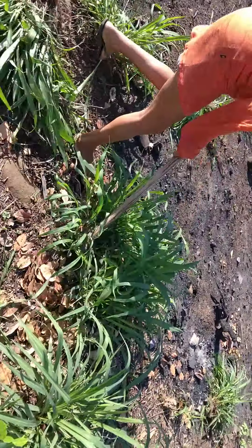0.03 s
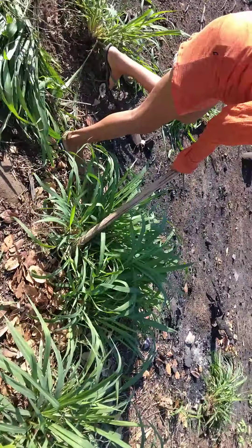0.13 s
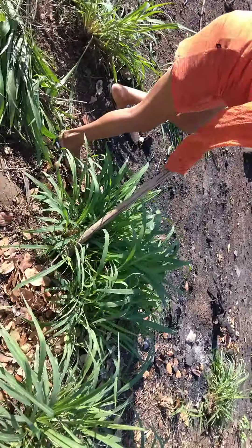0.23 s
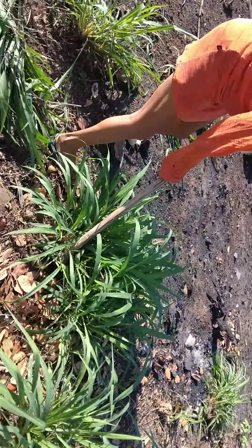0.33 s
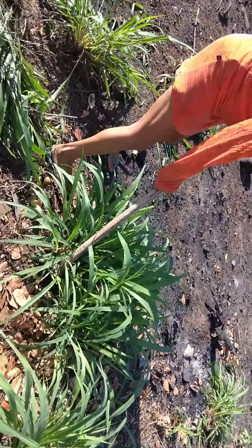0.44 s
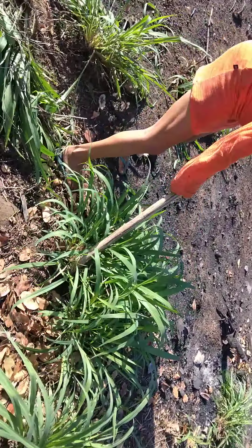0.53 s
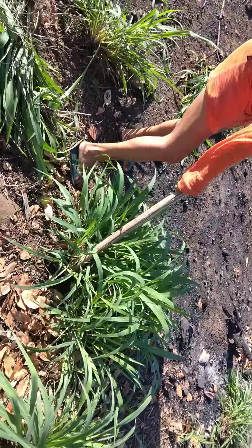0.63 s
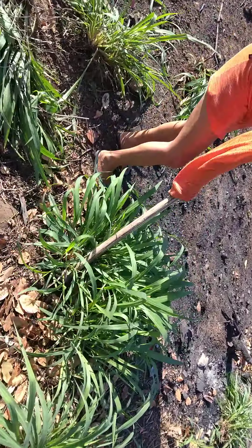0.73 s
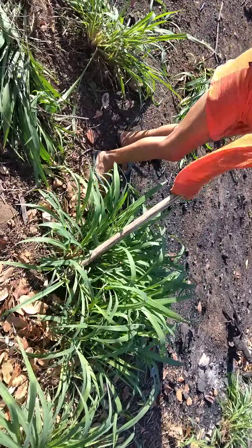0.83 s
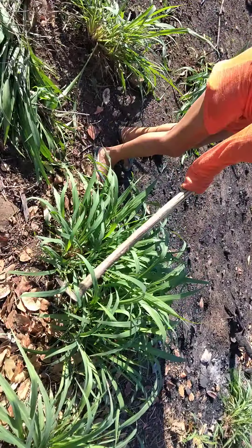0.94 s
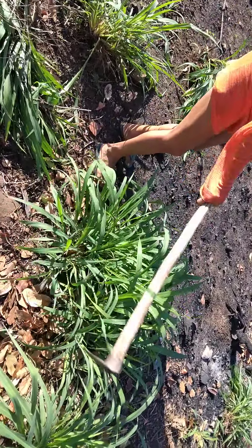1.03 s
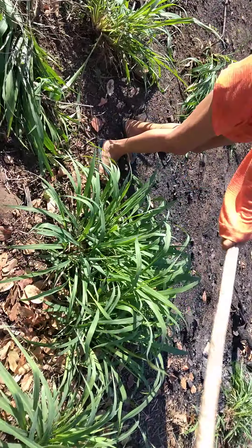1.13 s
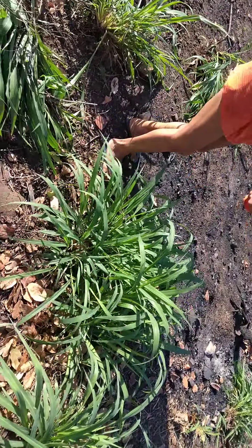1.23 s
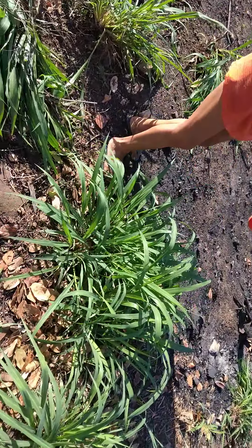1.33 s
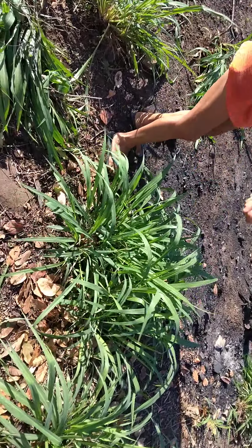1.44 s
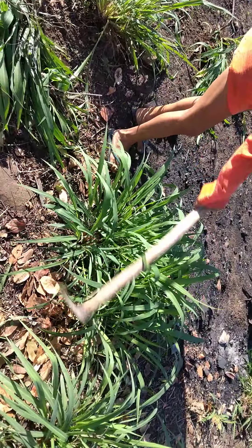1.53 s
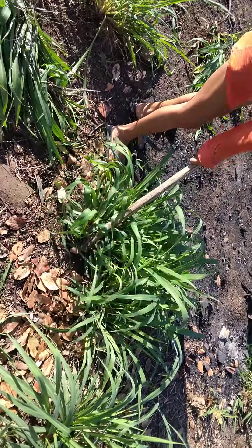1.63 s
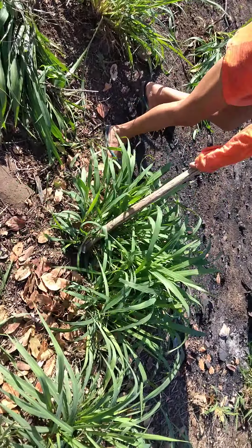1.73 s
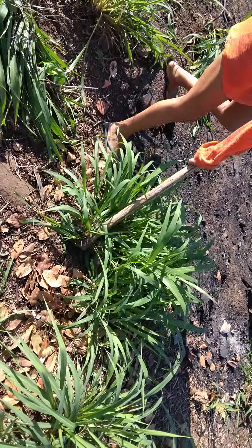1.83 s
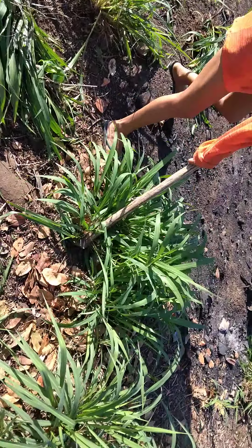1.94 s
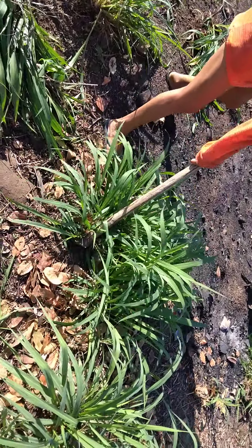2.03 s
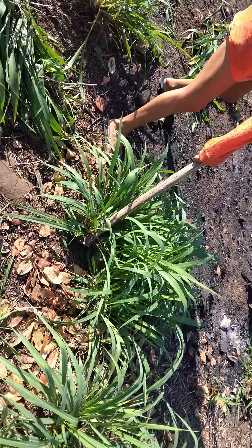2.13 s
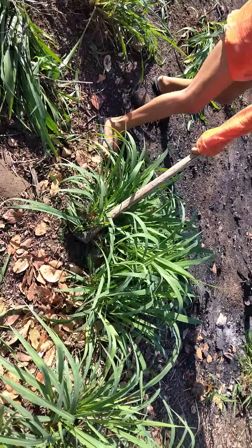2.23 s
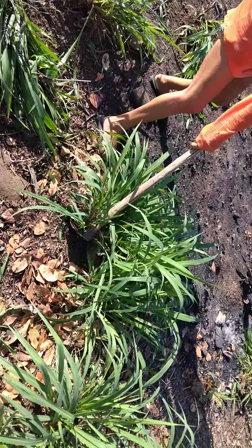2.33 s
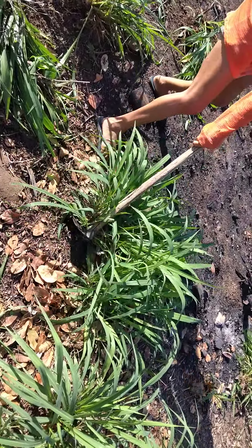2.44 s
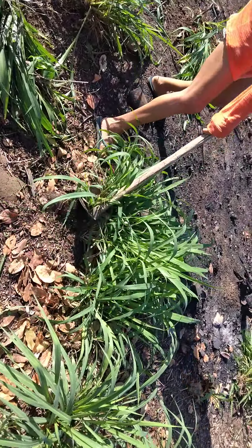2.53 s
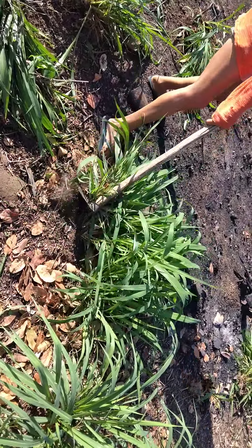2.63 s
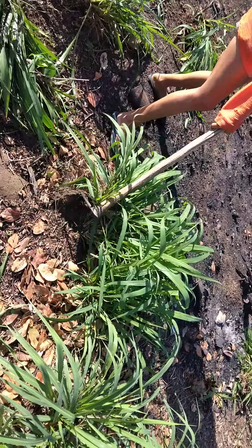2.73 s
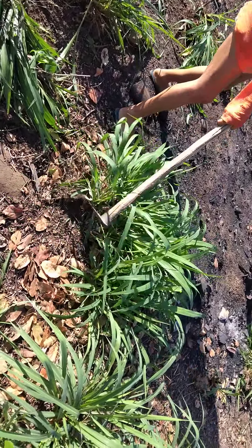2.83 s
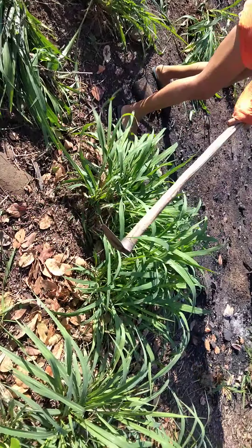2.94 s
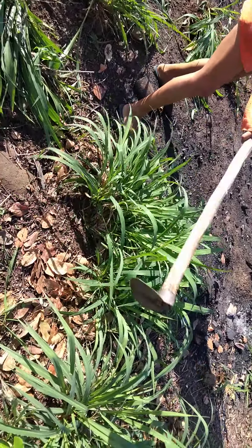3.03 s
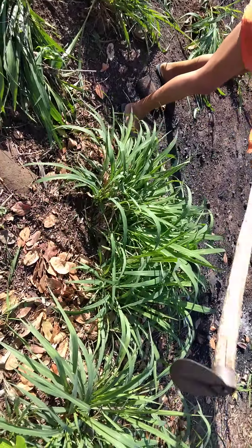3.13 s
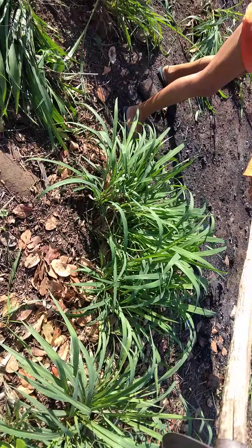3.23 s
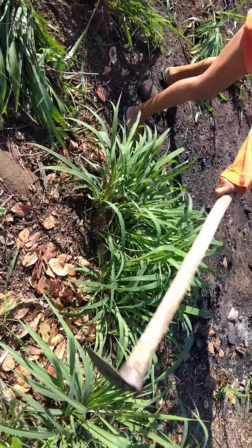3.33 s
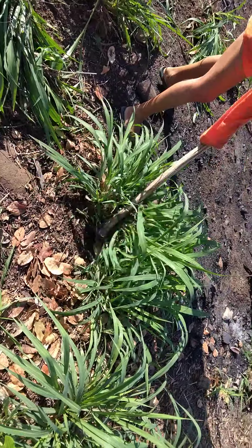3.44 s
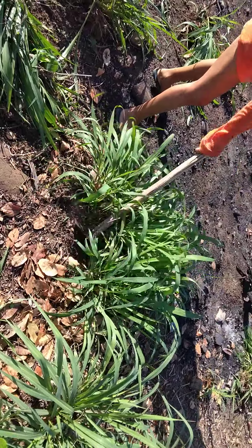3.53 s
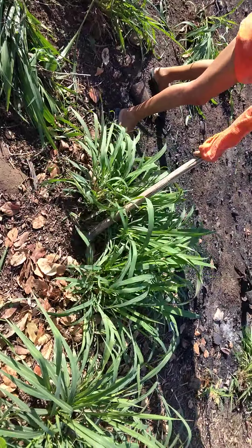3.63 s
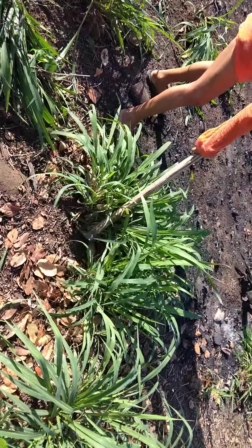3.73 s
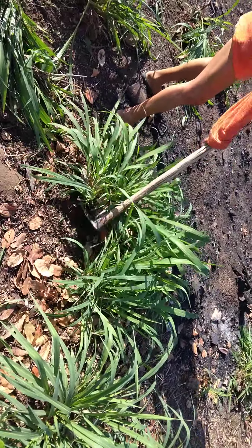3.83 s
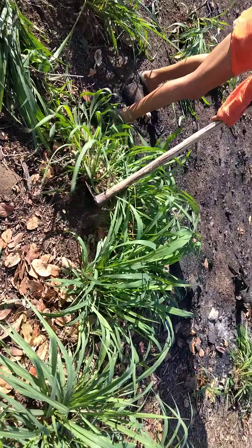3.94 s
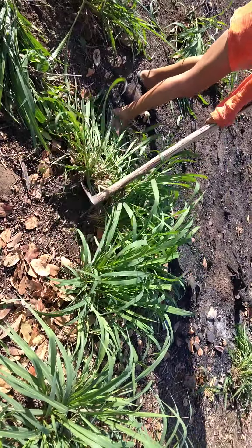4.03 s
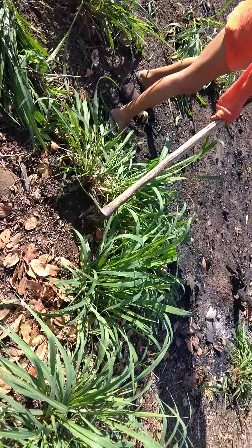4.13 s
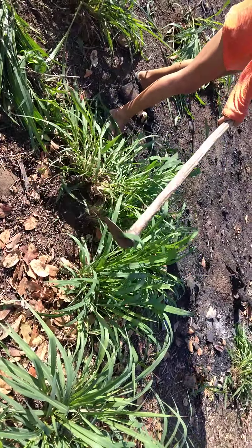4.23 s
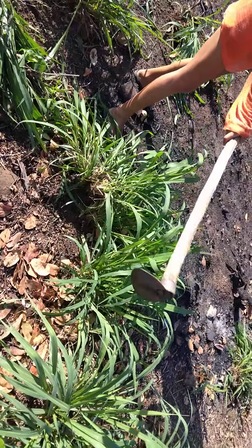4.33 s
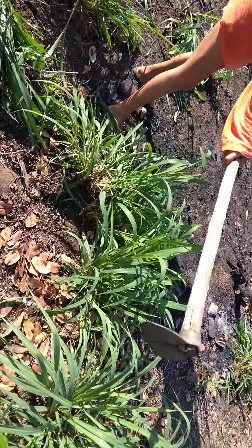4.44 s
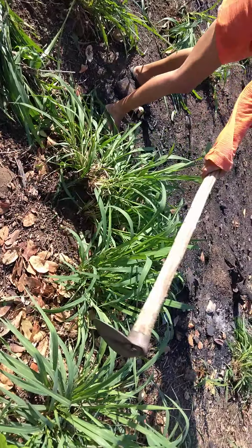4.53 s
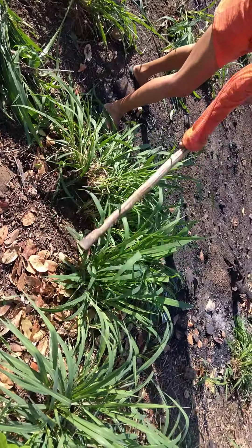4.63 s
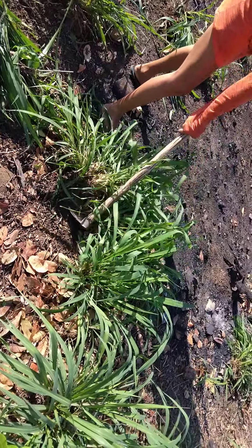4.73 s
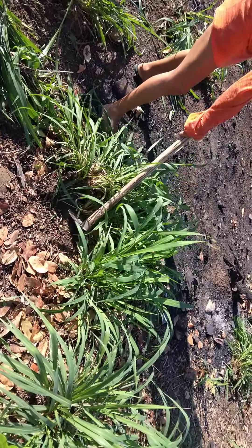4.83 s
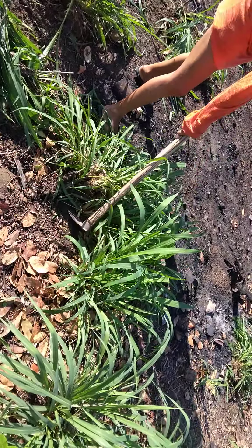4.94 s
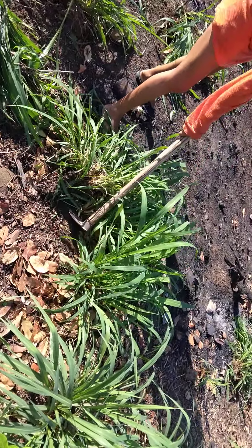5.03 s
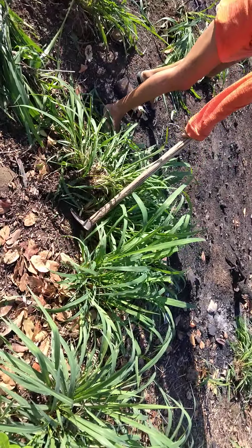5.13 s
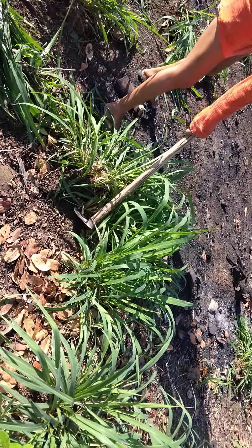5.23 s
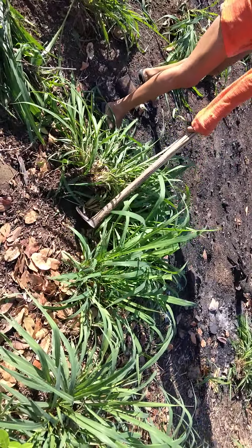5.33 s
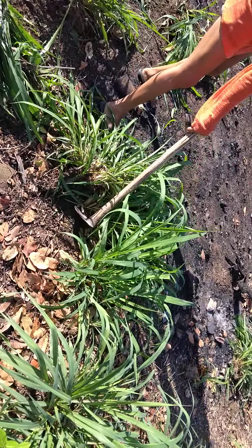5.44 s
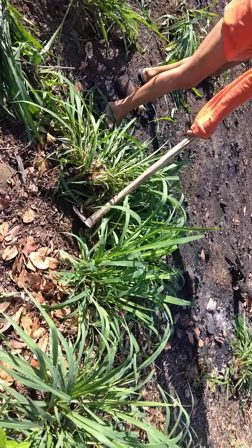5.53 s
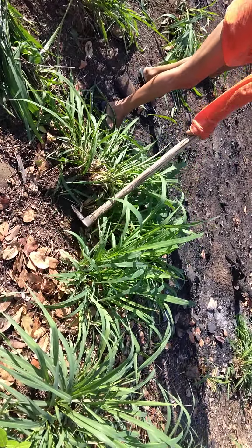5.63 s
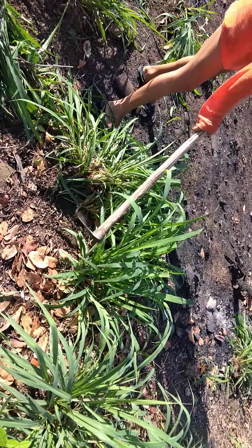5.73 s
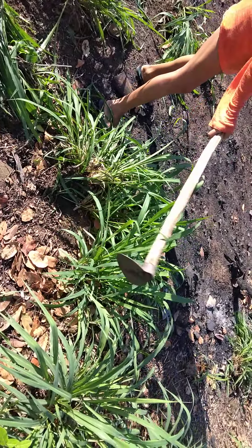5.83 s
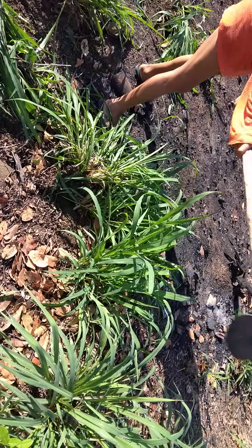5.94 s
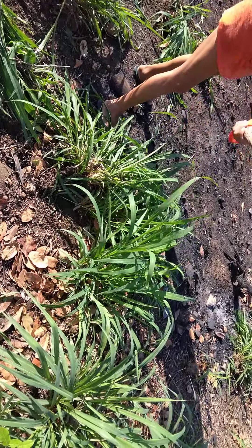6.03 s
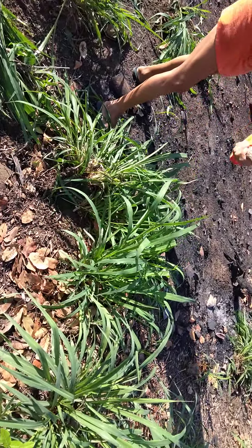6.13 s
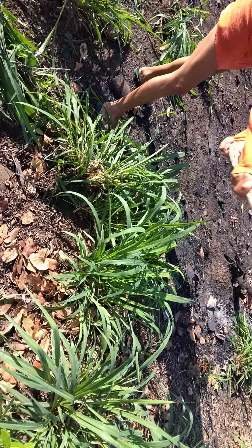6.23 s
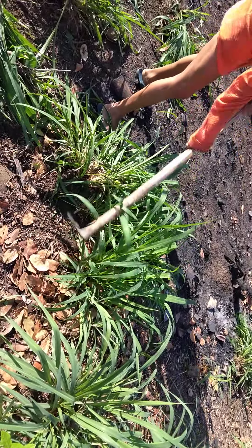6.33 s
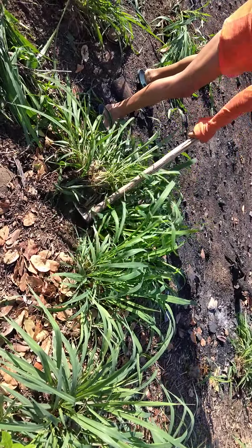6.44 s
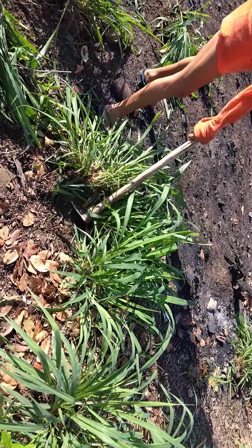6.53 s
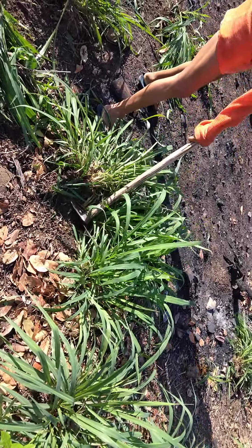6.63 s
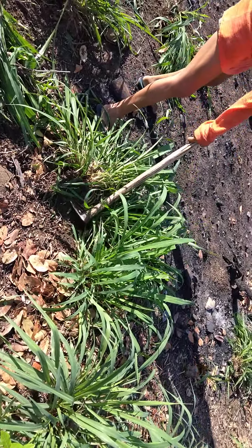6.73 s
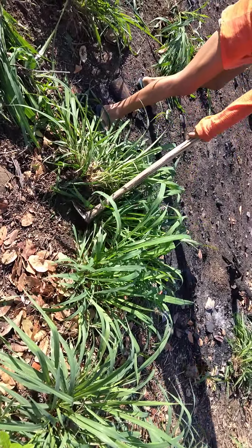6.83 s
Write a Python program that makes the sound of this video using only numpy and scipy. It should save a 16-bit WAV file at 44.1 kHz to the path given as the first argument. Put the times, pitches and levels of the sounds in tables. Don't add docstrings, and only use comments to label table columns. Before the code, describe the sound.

A hand hoe chops five times into dry soil under a grass clump, with leaves rustling and roots snapping between blows, light wind outdoors.

```python
import sys
import numpy as np
from scipy import signal
from scipy.fft import rfft, irfft, next_fast_len
from scipy.io import wavfile
from scipy.ndimage import uniform_filter1d

SR = 44100
rng = np.random.default_rng(int(sys.argv[2]) if len(sys.argv) > 2 else 0)


def put_to_file(sound):
    columns = np.atleast_2d(sound).T
    safe = np.clip(columns, -1, 1)
    whole_steps = np.round(safe * 32767)
    wavfile.write(sys.argv[1], SR, whole_steps.astype(np.int16))


def volts_from_decibels(level):
    exponent = np.asarray(level, float) / 20
    return 10 ** exponent


N = 304290
HZ = np.fft.rfftfreq(next_fast_len(N + 4096), 1 / SR)
T = np.arange(N) / SR
STEPS = T[::32]

# freq_hz, gain_db
LEFT_PORT = [(300, -2.5), (1000, -6.5), (2000, -4.5), (3500, -1.5), (4500, -1.5), (6200, -9), (7700, -2.5),
             (8300, -9), (9200, -21), (12000, -25), (15500, -30), (16300, -47.5)]
# freq_hz, gain_db
RIGHT_PORT = [(300, -3.5), (1000, -5), (2000, -10.5), (3800, -12.5), (5500, -10.5), (8000, -21),
              (9500, -14), (10700, -9.5), (11500, -14.5), (12500, -24), (15500, -28.5), (16300, -41.5)]
# freq_hz, correlation_0_1
PORT_LIKENESS = [(500, 0.96), (1500, 0.56), (2700, 0.17), (4000, 0.6), (5500, 0.52), (9000, 0.067)]


def evened(x):
    return x / np.sqrt(np.mean(x ** 2, -1, keepdims=True) + 1e-20)


def read(points, hz=HZ):
    point_hz, value = np.transpose(points)
    return np.interp(np.log(hz + 1), np.log(point_hz + 1), value)


def add(mix, start_s, sound):
    part = mix[..., round(start_s * SR):][..., :sound.shape[-1]]
    part += sound[..., :part.shape[-1]]


def shaped(x, gain):
    return irfft(rfft(x, 2 * len(HZ) - 2) * gain)[..., :N]


def delay(lag_s):
    return np.exp(-2j * np.pi * np.multiply.outer(lag_s, HZ))


def causal(db):
    cepstrum = irfft(np.log(volts_from_decibels(np.maximum(db, -100))))
    cepstrum[..., 1:len(HZ) - 1] *= 2
    cepstrum[..., len(HZ):] = 0
    return np.exp(rfft(cepstrum))


def wander(rate_hz):
    return evened(shaped(rng.standard_normal(N), 1 / (1 + (HZ / rate_hz) ** 2)))


def break_sizes(count, per_s, spread_db):
    size = volts_from_decibels(spread_db * np.minimum(rng.exponential(1, count), 4))
    return size * (rng.random(count) < per_s / SR)


def grit(count, per_s, spread_db, bed):
    size = signal.lfilter([1], [1, -.9], break_sizes(count, per_s, spread_db))
    return evened((evened(size) + bed) * rng.standard_normal((2, count)))


def pop(hz, cycles, t):
    return np.sin(2 * np.pi * hz * t) * (hz * t / cycles) * np.exp(1 - hz * t / cycles)


def strike(shape, db, soil_db, hiss_db):
    return volts_from_decibels(db + np.array([soil_db - 4, -6, hiss_db - 9]))[:, None, None] * shape


def to_ports(pair, hz):
    same = np.clip(read(PORT_LIKENESS, hz), 0, 1)
    lean_db = read(LEFT_PORT, hz) - read(RIGHT_PORT, hz)
    right = same * pair[0] + np.sqrt(1 - same ** 2) * pair[1]
    return volts_from_decibels(lean_db * np.array([[.5], [-.5]])) * [pair[0], right]


def chops():
    # start_s, crack_peak_db, soil_rel_db, hiss_rel_db, grind_s
    blade_cuts = [
        (0.0265, -7.5, -22, -12.5, 0.0046),
        (1.5825, -16, -7.5, -0.5, 0.0099),
        (3.447, -13, -11, -4.5, 0.0055),
        (4.6772, -22, -13, -1.5, 0.0085),
        (6.3722, -16, -3.5, -4.5, 0.0057),
    ]
    # start_s, peak_db, soil_rel_db, hiss_rel_db, grind_s
    root_rips = [
        (.757, -38, -14, 2, .004),
        (2.446, -31, -6, -8, .006),
        (2.461, -32, -4, -10, .004),
        (2.488, -32, -8, -6, .004),
        (3.8215, -31, -8, 10, .001),
        (3.85, -32, -8, -10, .011),
        (5.729, -56, -30, -2, .022),
        (5.837, -46, -10, 4, .004),
        (6.887, -37, -12, 0, .003),
    ]
    out, t = np.zeros((3, 2, N)), np.arange(2000) / SR
    for start_s, db, soil_db, hiss_db, grind_s in blade_cuts + root_rips:
        shape = np.minimum(t / .0015, 1) * np.exp(-np.maximum(t - grind_s, 0) / .0035)
        grains = grit(count=2000, per_s=5000, spread_db=5.5, bed=2.9)
        add(out, start_s, strike(shape * grains, db, soil_db, hiss_db))
    return out


def rings():
    # start_s, freq_hz, peak_db, rise_s
    tones = [(.0278, 4010, -11, .003), (.027, 3690, -17, .004), (.0265, 1290, -18, .0035),
             (.027, 870, -22, .0035), (.027, 1060, -24, .004), (.027, 2100, -20, .003),
             (.03, 5790, -21, .003), (1.585, 1340, -22, .004), (1.584, 4220, -24, .004),
             (1.586, 2360, -26, .004), (1.586, 7700, -27, .002), (3.447, 1790, -19, .003),
             (3.447, 3150, -24, .002), (3.446, 430, -27, .003), (3.447, 640, -28, .003),
             (3.452, 2200, -24, .002), (3.4875, 2500, -33, .0006), (3.4875, 600, -36, .001),
             (4.682, 724, -25, .004), (4.679, 1400, -29, .003), (4.679, 1800, -29, .003),
             (4.681, 1050, -24, .003), (4.681, 2580, -28, .003), (4.68, 2250, -28, .003),
             (4.4775, 4100, -52, .0006), (4.549, 3000, -49, .0007), (4.602, 3600, -53, .0006),
             (4.658, 600, -38, .001), (4.6575, 1400, -42, .0006), (6.3757, 694, -22, .003),
             (6.372, 2750, -16, .002), (6.3757, 380, -22, .002), (6.3755, 3150, -18, .0025),
             (6.375, 2150, -22, .002), (2.4905, 4100, -26, .0008), (2.5125, 1500, -27, .0008),
             (2.5675, 1400, -32, .001), (2.2262, 1800, -24, .0005), (3.8135, 7700, -31, .0008),
             (3.8135, 10800, -35, .0005), (3.822, 7460, -29, .0007), (3.822, 10000, -30, .0005),
             (3.822, 13500, -36, .0005), (3.822, 1600, -36, .001), (3.83, 1600, -30, .0012),
             (3.837, 2000, -31, .001), (3.8812, 1500, -26, .0008), (.758, 11200, -40, .0008),
             (1.0106, 7430, -37, .0015), (1.0106, 10500, -42, .001), (5.839, 8000, -45, .0008)]
    out, t = np.zeros((2, N)), np.arange(1000) / SR
    for start_s, hz, db, rise_s in tones:
        turn, u = 2 * np.pi * hz * t, t / max(rise_s, 1e-4)
        swell = u * np.exp(.5 - .5 * u ** 2)
        add(out, start_s, volts_from_decibels(db) * swell * to_ports([np.sin(turn), np.cos(turn)], hz))
    return out


def thuds():
    # start_s, knock_db, knock_hz, shake_db, shake_lead_s
    blows = [
        (0.0286, -25, 134, -20, 0.00049),
        (1.5893, -27, 168, -19.5, 0.0017),
        (2.51, -43.5, 190, -40, .002),
        (2.797, -45, 240, -50, 0.0028),
        (3.449, -27, 149, -23, 0.00035),
        (3.851, -44, 180, -46, 0.0022),
        (4.683, -20, 160, -19, 0.0017),
        (6.3758, -13, 178, -19, 0.0008),
    ]
    shake_hz, left_lag_s = 62, .00018
    out, t = np.zeros(N), np.arange(6000) / SR
    for start_s, knock_db, knock_hz, shake_db, lead_s in blows:
        dip = -.9 * np.exp(-((t - .0014) / 0.00036) ** 2)
        knock = np.sin(2 * np.pi * knock_hz * t) * np.exp(-t / 0.0074)
        shake = np.sin(2 * np.pi * shake_hz * t) * np.exp(-t / 0.013)
        add(out, start_s - .002, volts_from_decibels(knock_db) * dip)
        add(out, start_s, volts_from_decibels(knock_db) * knock)
        add(out, start_s - lead_s, volts_from_decibels(shake_db) * shake)
    return shaped(out, delay([left_lag_s, 0]))


def snaps():
    # start_s, peak_db, pitch_hz, soil_rel_db
    roots = [(.7575, -30, 3100, -35), (0.7897, -19, 5600, -21), (1.0124, -23, 5000, -24),
             (1.563, -29, 2580, -13), (2.2262, -12.5, 2840, -10.5), (2.3065, -25.5, 2770, -11),
             (2.3929, -18, 3200, -9.5), (2.4352, -18, 2960, -18), (2.4596, -21, 2200, -11.5),
             (2.49, -18, 2200, -6), (2.5062, -16, 4500, -16), (2.513, -14, 2200, -5),
             (2.5232, -17, 2400, -12), (2.5674, -21, 3070, -10), (2.7066, -30, 4100, -24.5),
             (3.4286, -27, 3210, -6), (3.57, -29.5, 2500, -5), (3.8142, -27, 4660, -10),
             (3.821, -23, 3310, -26), (3.8307, -22, 3000, -12), (3.8364, -23, 3430, -12),
             (3.8554, -22, 3700, -12), (3.8812, -11.5, 3320, -9.5), (4.6437, -24, 2510, -15),
             (5.8384, -28, 3980, -23.5), (6.3326, -21, 2000, -15), (6.351, -24, 4530, -14),
             (6.3605, -23, 3300, -14), (4.6805, -16, 2300, -12), (3.8497, -20, 2800, -8),
             (3.9215, -18, 2800, -12), (5.1586, -45, 2600, -3)]
    # start_s, peak_db, dryness_db (hiss)
    twigs = [(0.2086, -34, -7), (.2674, -44, 20), (.3275, -33, -5), (.355, -41, -14), (1.062, -37, 19),
             (1.152, -45, 14.5), (1.544, -35.5, 1.5), (2.0662, -42, -14), (2.2656, -37, -12),
             (2.3805, -42, -13.5), (2.4, -30, -13), (2.8017, -36, 3.5), (2.9885, -40.5, 8),
             (3.391, -38, -4), (3.488, -29, -17), (3.7253, -39, -14), (3.911, -32, -16.5),
             (4.057, -32, -17), (4.2452, -34, -8.5), (4.6583, -38, 6), (5.03, -46, 15), (5.385, -46, 12),
             (5.3247, -45.5, -25), (5.6038, -36, -8), (5.708, -42, -10), (5.7289, -38, -14),
             (5.8125, -41, 5), (6.4794, -38, 12), (6.581, -46, 12), (6.4969, -41, -1), (6.8248, -43, 10)]
    root_hiss_db, twig_hz, twig_soil_db = -8, 3700, -16.5
    rows = [(*root, root_hiss_db) for root in roots]
    rows += [(start_s, db, twig_hz, twig_soil_db, dry_db) for start_s, db, dry_db in twigs]
    out, t = np.zeros((3, 2, N)), np.arange(1000) / SR
    click = np.arange(1000) == 4
    for start_s, db, hz, soil_db, hiss_db in rows:
        splinters = .5 * rng.standard_normal((2, 1000)) * np.exp(-t / .003)
        push = splinters - 5 * click
        ring = splinters - 1.2 * pop(hz, .45, t)
        tick = splinters - 2 * click
        hiss_db = min(hiss_db, -26 - db)
        add(out, start_s + .0008, strike(np.array([push, ring, tick]), db - 5.0, soil_db, hiss_db))
    return out


def bump(start_s, stop_s, rise_s, fall_s):
    return -20 * np.maximum(np.maximum((start_s - STEPS) / rise_s, (STEPS - stop_s) / fall_s), 0)


def stirred(db, soil_db, fade_db):
    soil_fade, hiss_fade, hiss_db = .5, -0.042, -3.5
    over_db = np.array([min(soil_db, -3) + soil_fade * fade_db, 0 * fade_db, hiss_db + hiss_fade * fade_db])
    return volts_from_decibels(db + fade_db + over_db) ** 2


def effort():
    # start_s, swish_db, spill_20db_s, settle_db, soil_rel_db
    swings = [
        (0.021, -25.5, 0.055, -46, -7),
        (1.578, -29, 0.085, -44.5, -5.5),
        (3.441, -34, 0.0556, -41.5, -6),
        (4.679, -37.5, 0.0452, -46.5, -5),
        (6.366, -34.5, 0.075, -47, -1),
    ]
    # start_s, stop_s, leaves_db, fade_20db_s, soil_rel_db
    drags = [(0.302, .44, -64.5, 0.4, -14), (0.459, 0.507, -54.5, .33, -11.5), (.66, 0.76, -45.5, .05, -8),
             (0.856, 0.966, -47.5, 0.15, -10.5), (1.035, 1.06, -57, .05, -3), (1.12, 1.16, -62, .3, -12),
             (1.76, 1.83, -54, .15, -14), (2.12, 2.17, -62, .2, -9), (2.19, 2.42, -55.5, .1, -10),
             (2.44, 2.55, -41.5, .16, -6), (2.652, 2.7, -46, .27, -12.5), (2.79, 2.83, -52, .2, -7),
             (3.76, 3.81, -51, 0.05, -15), (3.821, 3.95, -41.5, .25, -11), (4.1, 4.14, -54, .1, -18),
             (4.24, 4.265, -57, .06, -14), (4.33, 4.36, -63, .2, -14), (5.27, 5.4, -61, .3, -15),
             (5.585, 5.6, -63, .08, -17), (5.7, 5.72, -59, .1, -20), (5.73, 5.755, -60, .02, -30),
             (5.812, 5.836, -57, .06, -6), (6.6, 6.69, -64, .15, -14), (6.8, 6.88, -63, -3, -11)]
    bed_db, swell_db = -69, 4
    swish_rise_s, settle_s, grab_s = 0.019, 0.3, 0.02
    power = stirred(bed_db, -10, 0 * STEPS)
    for start_s, swish_db, spill_s, settle_db, soil_db in swings:
        power += stirred(swish_db, soil_db, bump(start_s, start_s, swish_rise_s, spill_s))
        settling = bump(start_s + 0.021, start_s + .03, swish_rise_s, settle_s)
        power += stirred(settle_db, soil_db - 5, settling)
    for start_s, stop_s, db, fall_s, soil_db in drags:
        growth_db = swell_db * np.clip((STEPS - stop_s) / (stop_s - start_s + 1e-3), -1, 0)
        power += stirred(db + growth_db, soil_db, bump(start_s, stop_s, grab_s, fall_s))
    return np.array([np.interp(T, STEPS, db) for db in 10 * np.log10(power)])


def slips():
    # start_s, level_db, fade_20db_s, thinness_0_1
    blades = [(.69, -54, .1, 0), (.79, -54, .06, .3), (.885, -53, .12, 0), (.955, -52, .15, .1),
              (.92, -52, .1, 0), (1.014, -46, .05, .05), (1.05, -54, .04, .3), (1.066, -48, .012, .3),
              (2.53, -43, .12, .05), (3.815, -42, .01, 0), (3.86, -44, .2, .05), (4.25, -58, 0.07, 0),
              (5.735, -64, .04, 0), (5.772, -64, .03, 0), (5.815, -56, .05, .04), (5.842, -51, .03, .15),
              (6.372, -35, .045, .06), (4.71, -45, .16, .04)]
    power = np.zeros((2, len(STEPS)))
    for start_s, db, fall_s, thin in blades:
        share = np.clip([1 - thin, thin], 0, 1)
        power += np.outer(share, volts_from_decibels(db + bump(start_s, start_s, 0.02, fall_s)) ** 2)
    return [np.interp(T, STEPS, np.sqrt(part)) for part in power]


def crackle(per_s, spread_db):
    size = break_sizes(N, per_s, spread_db)
    kind, t, out = rng.integers(0, 16, N), np.arange(200) / SR, np.zeros((2, N))
    for k, hz in enumerate(np.geomspace(2100, 12000, 16)):
        train = signal.oaconvolve(size * (kind == k), evened(pop(hz, 1.3, t)))[:N]
        out += [train, np.roll(train, rng.integers(-12, 12)) * rng.choice([-1, 1])]
    return evened(out)


def rustle():
    levels_db = effort() + np.array([[-5.0], [-.9], [-.9]])
    clumps_db = 1.3 * wander(40) + np.array([1.1 * wander(35) for _ in levels_db])
    grains = grit(count=N, per_s=900, spread_db=2.6, bed=2) + .4 * crackle(per_s=1200, spread_db=2.6)
    out = volts_from_decibels(levels_db + clumps_db)[:, None] * grains
    broad, thin = slips()
    blade_grains = grains[:, ::-1]
    thin_grains = evened(signal.lfilter([1, -2, 1], [1, .75, .6], blade_grains))
    out[2] += volts_from_decibels(clumps_db[2]) * (broad * blade_grains + 2.5 * thin * thin_grains)
    return out


def scrapes():
    # start_s, length_s, freq_hz, width_hz, level_db
    rubs = [(.165, .004, 5000, 4000, -48), (.44, .006, 5000, 4000, -52), (.53, .003, 11500, 7000, -54),
            (.552, .003, 12500, 6000, -57), (.62, .06, 3200, 2000, -51), (.645, .03, 7900, 1200, -52),
            (.805, .05, 3300, 3000, -53), (.5, .06, 7500, 1500, -55), (.675, .035, 7500, 1500, -46),
            (.685, .045, 3300, 1200, -45), (.725, .022, 7500, 1200, -46), (.771, .004, 3500, 2500, -44),
            (.858, .05, 7500, 1200, -47), (.94, .035, 7700, 1500, -45), (.94, .035, 10700, 1500, -50),
            (.973, .003, 9000, 7000, -43), (1.034, .003, 10500, 4000, -55), (1.048, .024, 14500, 2500, -52),
            (1.048, .024, 10700, 1800, -50), (1.563, .008, 7600, 3000, -37), (1.572, .005, 3500, 3000, -31),
            (1.708, .012, 4000, 1800, -42), (2.446, .004, 4200, 2000, -36), (2.81, .008, 1500, 2500, -50),
            (2.995, .012, 3200, 1500, -54), (3.065, .02, 4400, 5000, -58), (3.41, .005, 3400, 1500, -48),
            (3.419, .008, 2300, 1500, -44), (3.434, .004, 3000, 3000, -36), (3.444, .004, 4000, 3000, -30),
            (4.668, .005, 4000, 3000, -39), (4.735, .035, 3500, 2500, -48), (4.3446, .004, 4060, 3000, -52),
            (5.725, .034, 5000, 1600, -46), (5.725, .03, 10800, 2000, -52), (5.727, .03, 7600, 1200, -56),
            (5.805, .025, 2500, 2500, -54), (5.765, .018, 10500, 3000, -56),
            (5.778, .002, 13000, 6000, -56)]
    # start_s, length_s, freq_hz, width_hz, level_db
    more_rubs = [(5.81, .035, 10800, 2500, -55), (5.862, .022, 8000, 1200, -60),
                 (5.876, .003, 3700, 2000, -56), (1.597, .065, 7600, 1200, -40),
                 (3.46, .035, 1500, 1500, -43), (5.728, .006, 5000, 2500, -45), (5.8, .03, 7500, 2500, -56),
                 (6.35, .02, 10500, 4000, -42), (3.851, .012, 7500, 1200, -38),
                 (3.883, .005, 2000, 3500, -30), (3.91, .003, 300, 400, -36), (2.5, .07, 1400, 1000, -38),
                 (3.68, .1, 4300, 1800, -54)]
    out, t = np.zeros((2, N)), np.arange(3000) / SR
    for start_s, length_s, hz, width_hz, db in rubs + more_rubs:
        noise = grit(count=3000, per_s=900, spread_db=4.5, bed=1.2)
        body = signal.iirpeak(hz, .7 * hz / width_hz, SR)
        coloured = evened(signal.lfilter(*body, signal.lfilter(*body, noise)))
        shape = np.minimum(t / (.3 * length_s), 1) * np.exp(-(t / length_s) ** 3)
        add(out, start_s, volts_from_decibels(db - 2.5) * shape * to_ports(coloured, hz))
    return out


def band_filters():
    edges_hz = [90, 1967, 6930]
    cut, low, high = (1 / (1 + (HZ / hz) ** 5) for hz in edges_hz)
    ports_db = np.array([read(LEFT_PORT), read(RIGHT_PORT)])
    ports = causal(10 * np.log10(1 - cut + 1e-10) + ports_db)
    pairs = np.array([low, high - low, 1 - high])[:, None] * ports
    return pairs / np.sqrt((abs(pairs) ** 2).mean((1, 2), keepdims=True) / 2)


def wind():
    # peak_s, level_db, half_width_s, left_minus_right_db
    gusts = [(.1, -60, .2, -6), (.45, -56.5, .2, -10.5), (.85, -52.5, 0.17, -19.5),
             (1.46, -55.5, 0.086, -9), (1.59, -38.5, 0.047, 2), (1.75, -55, 0.22, -12), (2.3, -63, .4, -6),
             (4.2, -59.5, .06, -6), (4.54, -52, .08, -18), (5, -62, .25, -6), (6.15, -59, .1, -15),
             (6.88, -57, .05, -18), (.2, -59, .06, -15), (4.07, -59, .05, -18)]
    # peak_s, signed_height, width_s
    puffs = [
        (.615, -0.042, 0.0043),
        (.948, -0.085, 0.0026),
        (1.629, 0.091, 0.032),
        (1.69, 0.051, 0.0033),
        (1.897, .09, 0.0027),
        (2.008, 0.064, 0.0027),
        (2.06, 0.031, 0.0031),
        (4.322, 0.11, 0.0035),
        (4.435, .04, .003),
        (4.527, -0.033, 0.003),
    ]
    # freq_hz, gain_db
    colour = [(10, 4.5), (22, 0), (40, -4), (70, -12.5), (120, -17.5), (250, -59)]
    breeze_db, breeze_pan_db = -60, -4
    side = np.array([[.5], [-.5]])
    power = volts_from_decibels(breeze_db + side * breeze_pan_db + 0 * STEPS) ** 2
    for peak_s, db, width_s, pan_db in gusts:
        power += volts_from_decibels(db + side * pan_db) ** 2 * np.exp(-((STEPS - peak_s) / width_s) ** 2)
    level = np.array([np.interp(T, STEPS, port) for port in np.sqrt(power)])
    lumps_db = np.array([4.2 * wander(8), 3. * wander(20)])
    rumble = evened(shaped(rng.standard_normal((2, N)), volts_from_decibels(read(colour))))
    out = level * volts_from_decibels(7.5 + lumps_db) * rumble
    for peak_s, height, width_s in puffs:
        u = (T - peak_s) / width_s
        out[1] += height * (np.exp(-u ** 2) - 0.24 * np.exp(-((u - 2.5) / 0.85) ** 2))
    return out


def birds():
    # start_s, length_s, start_hz, end_hz, level_db
    calls = [
        (1.229, 0.11, 2710, 2620, -63.5),
        (2.973, 0.061, 704, 650, -62),
        (4.275, 0.05, 707, 686, -63),
        (4.42, .18, 2510, 2510, -66.5),
        (4.97, 0.225, 2655, 2655, -68),
        (6.101, 0.039, 3270, 2880, -63.5),
        (6.428, 0.075, 690, 690, -53),
        (6.505, 0.03, 690, 690, -60),
        (6.555, .03, 690, 690, -66),
    ]
    out, waver, flutter = np.zeros(N), wander(30), wander(25)
    for start_s, length_s, from_hz, to_hz, db in calls:
        hz = np.linspace(from_hz, to_hz, round(length_s * SR))
        first = round(start_s * SR)
        now = slice(first, first + len(hz))
        tone = np.sin(2 * np.pi * np.cumsum(hz * (1 + .003 * waver[now])) / SR)
        fade = np.minimum(np.hanning(len(hz)) * (1 + length_s / .07), 1) ** .8
        add(out, start_s, volts_from_decibels(db + 1.5 * flutter[now]) * tone * fade)
    return out * volts_from_decibels(np.array([[1.5], [-1.5]]))


def air():
    # freq_hz, gain_db
    hum = [(60, -15), (100, -15), (350, -26), (650, -30.5), (1500, -50.5), (3000, -33.5), (5000, -42),
           (7700, -48), (8700, -54.5), (10800, -44.5), (16000, -59)]
    a, b = rng.standard_normal((2, N))
    return volts_from_decibels(-60.5 + 1.2 * wander(2.5)) * evened(shaped(np.array([a, 0.16 * a + b]), volts_from_decibels(read(hum))))


def scene():
    near = rfft(rustle() + chops() + snaps(), 2 * len(HZ) - 2)
    same = np.clip(read(PORT_LIKENESS), 0, 1)
    left = near[:, 0] * delay(2.5 / SR)
    right = same * near[:, 0] + np.sqrt(1 - same ** 2) * near[:, 1]
    work = irfft((np.stack([left, right], 1) * band_filters()).sum(0))[:, :N]
    return work + thuds() + wind() + birds() + air() + rings() + scrapes()


def low_pass(x):
    return signal.sosfilt(signal.butter(12, 16520, fs=SR, output="sos"), x)


def record(dry):
    # start_s, stop_s, depth_db
    shut = [
        (1.227, 1.544, -24),
        (2.015, 2.054, -15),
        (2.072, 2.095, -14),
        (3.096, 3.378, -23.5),
        (4.416, 4.645, -23.5),
        (5.037, 5.089, -9),
        (5.091, 5.152, -27),
        (5.522, 5.555, -11.5),
        (5.633, 5.651, -8),
        (5.885, 6.334, -25),
    ]
    # centre_s, lift_db, width_s
    lifts = [(1.246, 11.5, 0.011), (1.27, 10, 0.018), (1.305, 8, 0.015), (1.332, 11, 0.019),
             (1.434, 4, .008), (4.48, 11, .008), (4.55, 4.5, 0.009), (4.579, 15, 0.01), (4.62, 14, 0.012),
             (4.603, 10, .008), (5.127, 16, .01), (5.931, 11, .012), (6.019, 18, 0.008),
             (6.064, 6.5, 0.0098), (6.119, 8.5, 0.021), (6.245, 15, 0.01)]
    edge_hz = 15960
    gate_db = np.zeros(N)
    for start_s, stop_s, db in shut:
        gate_db += db * ((T >= start_s) & (T < stop_s))
    for centre_s, db, width_s in lifts:
        gate_db += db * (abs(T - centre_s) < width_s / 2)
    gate = volts_from_decibels(uniform_filter1d(np.minimum(gate_db, 0), size=150))
    treble = shaped(dry, 1 - 1 / (1 + (HZ / 1000) ** 4))
    gated = dry - treble * (1 - gate)
    limited = shaped(np.tanh(gated), np.clip((edge_hz - HZ) / 60 + 1, .02, 1))
    return low_pass(limited)


dry = scene()
out = record(dry)
put_to_file(out)
```